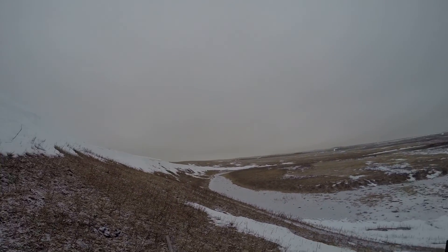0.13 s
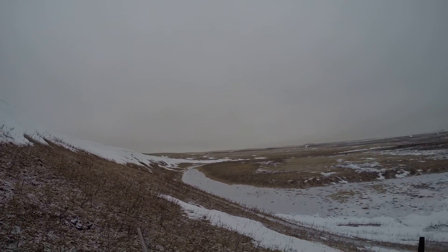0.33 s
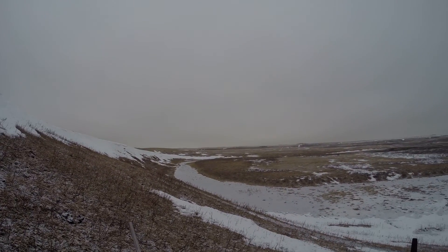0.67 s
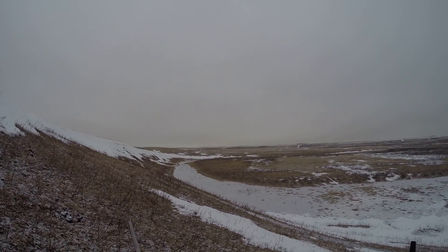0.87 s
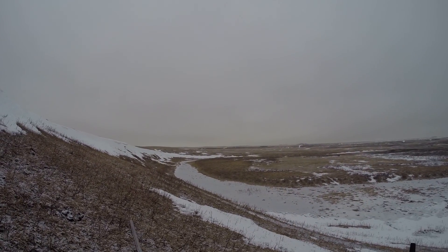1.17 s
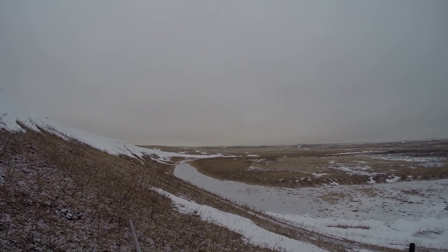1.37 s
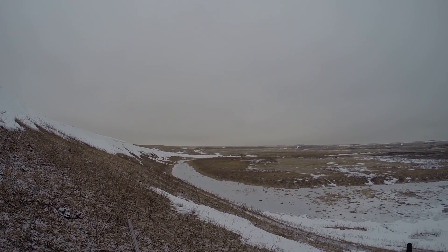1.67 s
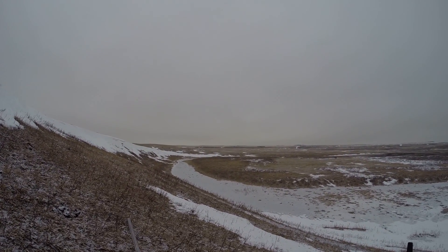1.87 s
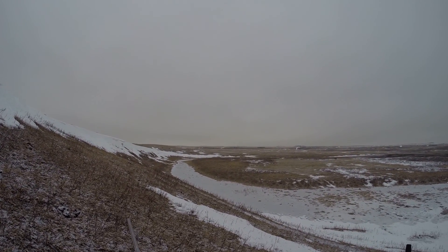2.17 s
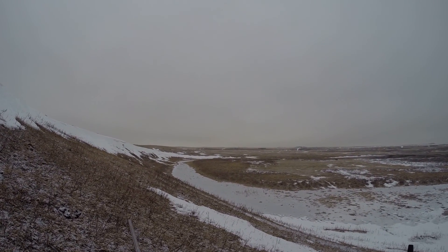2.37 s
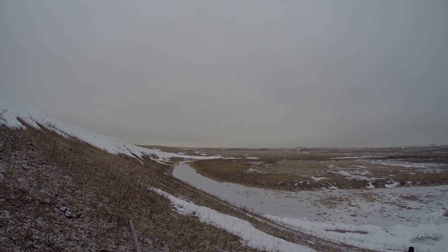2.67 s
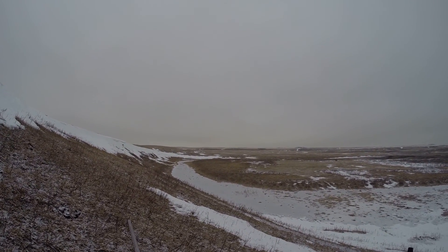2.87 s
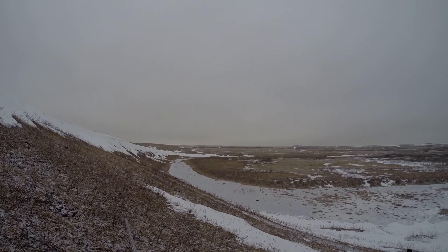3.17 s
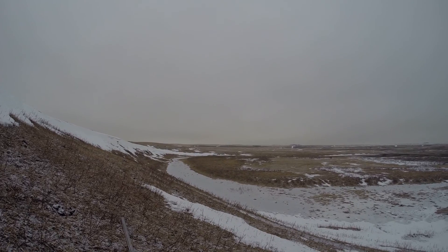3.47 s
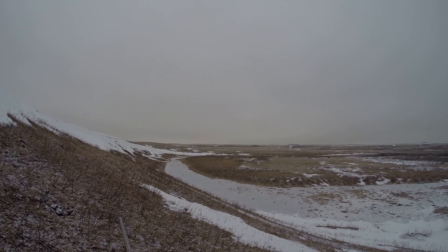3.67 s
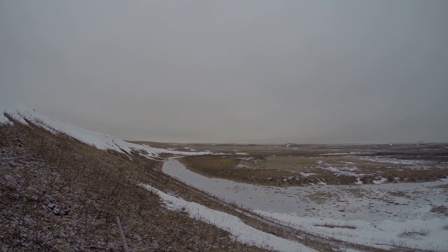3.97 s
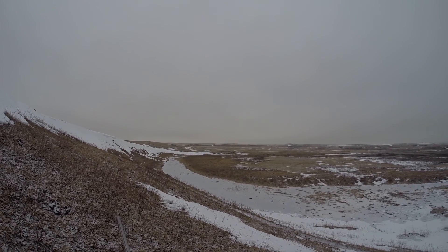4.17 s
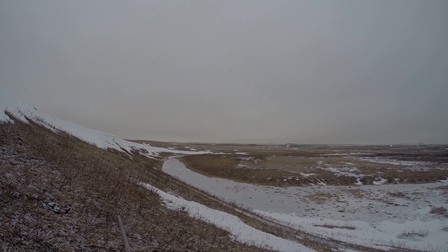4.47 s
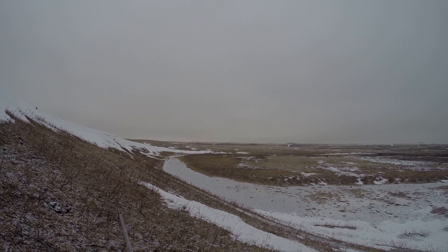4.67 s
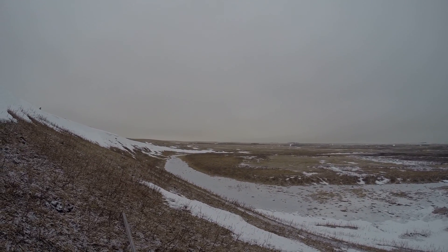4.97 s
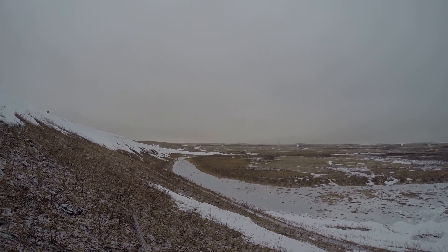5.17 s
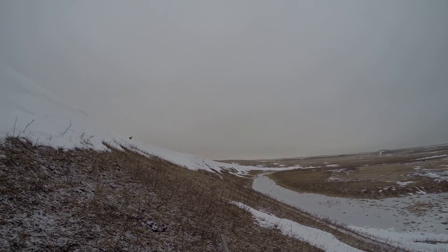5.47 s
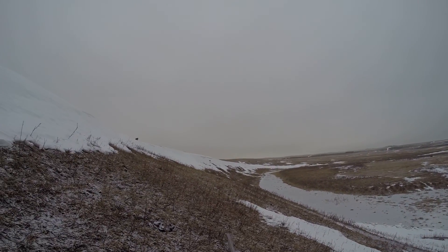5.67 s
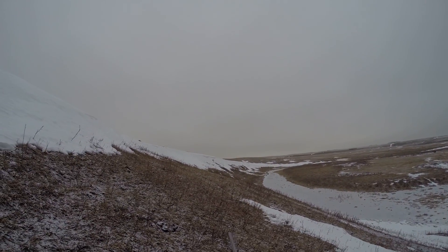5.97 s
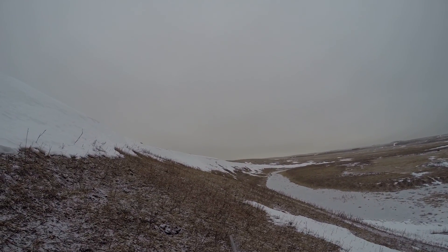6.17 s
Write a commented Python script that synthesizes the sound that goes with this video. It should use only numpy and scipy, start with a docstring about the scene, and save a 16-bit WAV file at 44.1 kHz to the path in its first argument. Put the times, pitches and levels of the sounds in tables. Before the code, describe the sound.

Coyotes call across an open, snowy valley. Two quick yips lead into a run of short, high howls that waver, jump in pitch and sometimes crack into roughness. Around four seconds in come four softer yips, then two more howls. Faint hoarse breath surrounds the calls and the slopes return a slight echo. A low breeze and soft hiss stay steady underneath.

```python
"""Coyotes yip and howl in a quick run across an open, snowy valley.
Their vocal folds oscillate in a nearly pure, gliding tone that drops an octave by period doubling
or turns rough in chaos. Throat and muzzle filter it by resonance, and turbulent breath adds hoarse air.
Reflection from the slopes returns a faint echo; behind it lie a low breeze and a soft hiss,
with faint high chirps and thin whistles."""
import sys
import numpy as np
from scipy import signal
from scipy.fft import rfft, irfft
from scipy.io import wavfile
from scipy.ndimage import uniform_filter1d

SR = 44100
rng = np.random.default_rng(int(sys.argv[2]) if len(sys.argv) > 2 else 0)


def to_wav(sig):
    """Store sig (one row per channel, or 1-D mono) as 16-bit WAV at the path in sys.argv[1].

    Samples outside -1..1 are clipped; the rate is SR.
    """
    pcm = np.clip(np.atleast_2d(sig), -1, 1) * 32767
    pcm = np.round(pcm).astype(np.int16)
    wavfile.write(sys.argv[1], SR, pcm.T)  # frames by channels


N = 278712
TIME = np.arange(N) / SR

# Fundamental of the short yips, one curve each: t/s, f/Hz, source level/dB
YIPS = [
    [(0.138, 874, -59), (0.146, 1010, -41.5), (0.158, 1239, -38), (0.176, 1233, -43.5), (0.2, 865, -48.5),
     (0.205, 882, -50)],
    [(0.29, 1175, -54), (0.298, 1200, -48), (0.318, 924, -45), (0.33, 1173, -39), (0.352, 1146, -35),
     (0.374, 970, -47), (0.385, 990, -73)],
    [(4.24, 992, -60), (4.26, 1002, -43.5), (4.286, 950, -45.5), (4.314, 963, -49.5), (4.33, 976, -61)],
    [(4.405, 1117, -49), (4.417, 1003, -51.5), (4.461, 1062, -38.5), (4.471, 1198, -40),
     (4.491, 1195, -42.5), (4.503, 1190, -66)],
    [(4.66, 896, -53), (4.684, 1005, -47), (4.698, 993, -42), (4.722, 906, -53), (4.73, 919, -55)],
    [(4.817, 1084, -59), (4.835, 956, -57.5), (4.855, 967, -52.5), (4.877, 1028, -49.5),
     (4.929, 1025, -54.5), (4.944, 980, -73)],
]
# Fundamental of the wavering howls, one curve each: t/s, f/Hz, source level/dB
HOWLS = [
    [(0.586, 964, -67), (0.592, 942, -53), (0.612, 941, -47), (0.64, 1031, -39), (0.674, 954, -41.5),
     (0.686, 1093, -38), (0.718, 1062, -40), (0.734, 992, -39), (0.778, 981, -46.5), (0.792, 1117, -43.5),
     (0.805, 1072, -55)],
    [(1.052, 927, -57), (1.068, 936, -42.5), (1.082, 1106, -35.5), (1.096, 1135, -36), (1.104, 1135, -41),
     (1.112, 1068, -41.5), (1.12, 962, -40), (1.146, 974, -47), (1.222, 954, -38.5), (1.276, 944, -43.5),
     (1.295, 876, -59)],
    [(1.475, 899, -52), (1.481, 912, -47.5), (1.495, 1131, -34), (1.511, 1316, -44), (1.545, 1025, -41.5),
     (1.577, 962, -40.5), (1.597, 1057, -36.5), (1.613, 1244, -30.5), (1.631, 1279, -38),
     (1.653, 1249, -32), (1.683, 1295, -35.5), (1.709, 1492, -38.5), (1.725, 1525, -37.5),
     (1.789, 1491, -35), (1.805, 1192, -36.5), (1.813, 1027, -49), (1.82, 1001, -52)],
    [(1.989, 956, -58), (2.007, 953, -41.5), (2.021, 958, -39.5), (2.037, 921, -48), (2.067, 899, -45),
     (2.101, 974, -39), (2.145, 973, -38.5), (2.163, 1120, -34), (2.171, 1119, -35), (2.181, 1056, -38.5),
     (2.191, 1110, -37), (2.201, 1099, -35.5), (2.215, 928, -42.5), (2.223, 915, -46), (2.309, 917, -43),
     (2.347, 957, -39), (2.371, 1020, -36), (2.475, 990, -34.5), (2.603, 975.5, -38.5), (2.612, 996, -52)],
    [(2.781, 933, -54.5), (2.795, 937, -41), (2.807, 1200, -35.5), (2.835, 1211, -34), (2.879, 1080, -36.5),
     (2.905, 1096, -37), (2.933, 1188, -37.5), (2.971, 1160, -38.5), (2.993, 1059, -38),
     (3.005, 934.5, -43), (3.101, 958, -40.5), (3.121, 1043, -38.5), (3.175, 943, -46), (3.203, 975, -38.5),
     (3.229, 1045, -38), (3.251, 1053, -44.5), (3.258, 1050, -54)],
    [(3.497, 977, -45), (3.503, 974, -47), (3.547, 980, -38.5), (3.597, 1122, -38), (3.641, 1143, -36),
     (3.723, 1151, -38), (3.775, 1306, -41), (3.863, 1370, -46), (3.869, 1424, -46.5), (3.897, 1267, -48),
     (3.911, 1485, -46), (3.957, 1634, -49), (3.999, 1608, -53), (4.025, 1478, -48), (4.033, 1430, -53)],
    [(5.122, 1004, -64), (5.136, 980, -57.5), (5.16, 1147, -57.5), (5.186, 1135, -59), (5.272, 1141, -41.5),
     (5.338, 1148, -35), (5.366, 1133, -36), (5.392, 1077, -38.5), (5.41, 1162, -35), (5.428, 1041, -37.5),
     (5.454, 980, -39), (5.552, 950.6, -45), (5.578, 985, -38), (5.587, 986, -49)],
    [(5.812, 1042, -53.5), (5.822, 1140, -35), (5.834, 1454, -34), (5.836, 1476, -34), (5.87, 1494, -33),
     (5.888, 1414, -35.5), (5.9, 1172, -35), (5.928, 1162, -38.5), (5.97, 1144, -32.5),
     (5.99, 986.5, -41.5), (5.998, 970, -39.5), (6.07, 916, -47), (6.136, 915.5, -52.5),
     (6.2, 907.0, -48.5), (6.296, 897.8, -68.5), (6.31, 924.6, -69)],
]
# Period doubling: start t/s, end t/s, subharmonic source level/dB
BREAKS = [(0.593, 0.79, -49), (1.088, 1.136, -50), (2.013, 2.083, -47), (2.093, 2.189, -43),
          (2.16, 2.237, -41), (2.385, 2.604, -40.5), (2.871, 3.009, -38.5), (2.973, 3.097, -45),
          (3.053, 3.223, -41), (3.66, 3.737, -39.5), (4.68, 4.726, -51), (5.353, 5.41, -48),
          (5.4, 5.515, -46.5), (5.95, 6.07, -40)]
# Cracks in the voice: start t/s, end t/s, beat rate as a share of the pitch, beat depth, chaos depth
CRACKS = [(0.314, 0.356, 0.2, 0.12, 0.46), (0.614, 0.77, .25, .03, .1), (0.771, .803, 0.25, 0.051, 0.6),
          (1.079, 1.115, 0.2, 0.036, 0.13), (1.471, 1.511, 0.28, .03, 0.13),
          (2.157, 2.199, 0.21, 0.14, 0.38), (2.783, 2.814, .25, 0.08, 0.31),
          (2.885, 2.918, 0.24, 0.35, 0.18), (2.908, 2.987, 0.23, 0.11, 0.56),
          (3.661, 3.744, .25, 0.28, 0.04), (3.807, 3.887, 0.32, 0.91, 0.22),
          (5.305, 5.357, 0.33, 0.053, .14), (5.345, 5.431, 0.25, 0.1, 0.2968), (5.879, 5.903, .25, .05, .2)]
# Pressed (brighter) or eased (duller) voice: start t/s, end t/s, overtone gain/dB
PRESSES = [(1.036, 1.141, 7), (1.56, 1.851, 1), (1.968, 2.08, 1), (2.205, 2.36, 2), (2.77, 3.018, 10.5),
           (3.475, 3.8, 10.5), (3.765, 4.06, 6.5), (4.645, 4.741, 8.5), (5.248, 5.5, 7), (5.76, 6.02, -13),
           (6.092, 6.4, -4)]
# Transfer function of the throat: f/Hz, gain/dB
THROAT = [(500, -21.5), (850, -2.5), (1550, 0), (1800, -27), (2300, 14), (3200, -2.5)]
# Resonances of the muzzle, which pick out single overtones: f/Hz, gain/dB
MUZZLE = [(2000, 0.5), (2130, -10), (2300, -1.5), (2520, -7), (2770, 7.5), (3100, -4), (3500, 2.5),
          (4000, -3.5)]
# Spectrum of the breath: f/Hz, relative level/dB
AIR_SPECTRUM = [(250, -14.5), (380, -4), (450, 5.5), (640, -9), (800, 4), (1100, 3.5), (1530, 4),
                (1720, -4), (1920, -4.5), (2100, -7.5), (2300, -4.5), (2480, -6), (2760, -7), (3500, -17),
                (6000, -23.5), (12000, -42)]
# Hoarse huffs around the calls: start t/s, end t/s, relative level/dB
HUFFS = [(0.247, 0.556, -67.5), (0.668, 0.91, -71), (1.145, 1.42, -66.5), (1.367, 1.568, -64),
         (1.575, 1.8, -68.5), (1.84, 1.956, -71), (3.1, 3.327, -66), (3.764, 4.15, -63),
         (4.196, 4.389, -63.5), (4.4, 4.619, -67), (4.703, 4.82, -66), (5.254, 5.5, -68),
         (6.108, 6.356, -66.5)]
# Reflections from the slopes: delay t/s, gain/dB ahead of ECHO_COLOUR
ECHOES = [(0.044, -40.5), (0.107, -30), (.155, -27.5), (0.202, -34.5)]
# Transfer function of the echo: f/Hz, gain/dB
ECHO_COLOUR = [(700, -15.5), (1000, -1.5), (1250, 1.5), (1500, 5), (2000, 19), (4000, 9)]
# Spectrum of the breeze and hiss: f/Hz, relative level/dB
BREEZE_SPECTRUM = [(15, -7), (33, 1), (60, -3.5), (100, -9.5), (230, -11), (350, -15.5), (470, -15.5),
                   (700, -18), (1400, -36.5), (2000, -25.5), (4000, -29), (8500, -36.5), (13800, -41),
                   (14500, -42.5)]
# Peaks of the high chirps: t/s
CHIRP_TIMES = [.67, .81, .94, 1.2, 1.31, 1.55, 1.791, 1.96, 2.199, 2.31, 3.141, 3.3, 3.67, 3.8, 4.039, 4.44,
               4.71, 4.84]
# Faint whines and whistles: start t/s, end t/s, start f/Hz, end f/Hz, level/dB
WHISTLES = [(0.098, 0.158, 1630, 1490, -60), (0.797, 0.902, 1550, 1640, -71),
            (1.028, 1.063, 1620, 1820, -64), (1.458, 1.481, 1620, 1800, -56),
            (2.767, 2.801, 1750, 1914, -51.5), (1.81, 1.963, 1520, 1510, -61.5),
            (2.94, 3.027, 13130, 13600, -82), (5.82, 5.895, 13220, 13400, -78)]

AIR_REST_DB, AIR_CALL_DB, AIR_CRACK_DB = -74, -75.5, -58.5  # relative flow: constant, calling, full chaos


def coyotes(jitter=0.0062, shimmer=0.06):
    """Source and filter: the vocal folds give a strong fundamental, and the muzzle's resonances shape it."""
    times, pitches, levels = np.vstack(sorted(YIPS + HOWLS, key=lambda call: call[0][0])).T
    hz, level_db = np.interp(TIME, times, pitches), np.interp(TIME, times, levels)
    waver = 1 + jitter * band_noise(0, 110)
    stumble = 0.0694 * chaos_depth(edge_s=0.0071) * band_noise(0, 95)  # chaos shakes the pitch too
    cycles = np.cumsum(uniform_filter1d(hz, size=120) * (waver + stumble)) / SR
    tone = np.exp(2j * np.pi * cycles)
    harmonics = gain_of(level_db) * tone + overtones(tone, hz, level_db)
    sounding = calling(YIPS, edge_s=0.014) + calling(HOWLS, edge_s=0.0027)
    envelope = np.sqrt(2) * sounding * (1 + shimmer * band_noise(0, 110))
    voice = envelope * harmonics
    halves = coloured(envelope * subharmonics(cycles, level_db), THROAT)
    return coloured(voice.real + halves, MUZZLE) + cracks(voice, cycles)


def overtones(tone, hz, level_db, ordinary_db=-39.5, pure_hz=961, buzzy_hz=947, fray=0.4):
    """Non-sinusoidal fold motion adds weak harmonics 2 to 4, stronger in loud, low or pressed notes."""
    buzz = np.clip((pure_hz - hz) / (pure_hz - buzzy_hz), 0, 1)
    overtone_db = -75.5 + 0.16 * (level_db - ordinary_db) + 10.5 * buzz + pressing_db()
    series = tone ** 2 + gain_of(-13) * tone ** 3 + gain_of(-28) * tone ** 4
    return gain_of(overtone_db) * series * (1 + fray * band_noise(0, 140))


def subharmonics(cycles, level_db, unbroken_db=-40, edge_share=0.26):
    """Period doubling puts lines at odd multiples of half the pitch; a trace remains between breaks."""
    breaks = sum(gain_of(db) * gate(start, end, edge_share * (end - start)) for start, end, db in BREAKS)
    lines = sum(gain_of(db) * np.cos(2 * np.pi * ratio * cycles)
                for ratio, db in [(0.5, -22), (1.5, 0), (2.5, -38), (3.5, -32)])
    return (gain_of(level_db + unbroken_db) + breaks) * lines


def cracks(voice, cycles):
    """Modulation: the folds beat or tumble into chaos, making sidebands that the throat filters."""
    chaos = (band_noise(140, 210) + 1j * band_noise(90, 190)) / np.sqrt(2)
    modulation = np.zeros(N, complex)
    for start, end, share, beat_depth, rough in CRACKS:
        beat = beat_depth * np.cos(2 * np.pi * share * cycles)
        modulation += gate(start, end, edge_s=0.01) * (beat + rough * chaos)
    return coloured((voice * modulation).real, THROAT)


def calling(calls, edge_s):
    """Phonation envelope: 1 during the given calls, 0 in the pauses."""
    return sum(gate(call[0][0] - edge_s / 2, call[-1][0] + edge_s / 2, edge_s) for call in calls)


def chaos_depth(edge_s):
    """Depth of aperiodic fold motion at each moment."""
    return sum(rough * gate(start, end, edge_s) for start, end, _, _, rough in CRACKS)


def pressing_db():
    """Pressed phonation strengthens the overtones; eased phonation weakens them."""
    return sum(db * gate(start, end, edge_s=0.046) for start, end, db in PRESSES)


def hoarse_air(gain_db=9, flutter_db=0.8, patchy_db=3.5):
    """Turbulence in the throat gives broadband noise, in which narrow bands swell briefly."""
    frames = dict(nperseg=2048, noverlap=1536)
    spectra = signal.stft(coloured(rng.standard_normal(N), AIR_SPECTRUM), **frames)[2]
    patches = uniform_filter1d(rng.standard_normal(spectra.shape), size=4, axis=0)  # across frequency
    patches = unit_rms(uniform_filter1d(patches, size=9, axis=1))  # across time
    rush = unit_rms(signal.istft(spectra * gain_of(patchy_db * patches), **frames)[1][:N])
    return rush * air_flow() * gain_of(gain_db + flutter_db * band_noise(0, 27))


def air_flow(blur_s=0.13, press_share=0.27):
    """Incoherent noises add in power: resting breath, leakage in calls and cracks, and huffs."""
    call_leak = gain_of(AIR_CALL_DB + press_share * pressing_db()) * calling(YIPS + HOWLS, edge_s=0.014)
    crack_leak = gain_of(AIR_CRACK_DB) * chaos_depth(edge_s=0.029)
    leak_power = uniform_filter1d(call_leak ** 2 + crack_leak ** 2, int(blur_s * SR))
    return np.sqrt(gain_of(AIR_REST_DB) ** 2 + leak_power + huffing() ** 2)


def huffing():
    """Amplitude envelope of the huffs of breath."""
    return sum(gain_of(db) * gate(start, end, edge_s=0.067) for start, end, db in HUFFS)


def rasps():
    """Narrow-band breath noise: one band on the pressed voice, a higher one on the huffs."""
    strain = np.maximum(gain_of(pressing_db()) - 1, 0)
    rasp = gain_of(AIR_CALL_DB - 13) * strain * band_noise(2100, 160)
    return rasp + gain_of(-9) * huffing() * band_noise(2680, 200)


def valley_echo(x, scatter_db=-26, t60_s=1.0, spread_s=0.009):
    """Reflection from the slopes gives smeared echoes; scattering by rough ground adds a thin tail."""
    t = TIME[:SR]
    scatter = rng.standard_normal(SR) * np.minimum(t / 0.02, 1) * gain_of(-60 * t / t60_s)
    response = gain_of(scatter_db) * scatter / np.linalg.norm(scatter)
    for delay, db in ECHOES:
        smear = rng.standard_normal(SR) * np.exp(-abs(t - delay) / spread_s)
        response += gain_of(db) * smear / np.linalg.norm(smear)
    return coloured(signal.fftconvolve(x, response)[:N], ECHO_COLOUR)


def breeze(level_db=-58.5, swell_db=0.02):
    """Almost stationary broadband noise: a low breeze and an even hiss."""
    noise = unit_rms(coloured(rng.standard_normal(N), BREEZE_SPECTRUM))
    return noise * gain_of(level_db - swell_db * band_noise(0, 7.6))


def chirps(level_db=-78.5, half_width_s=0.048):
    """Gaussian pulses of narrow-band noise make soft, hissy chirps far above the calls."""
    swells = sum(np.exp(-((TIME - peak) / half_width_s) ** 2) for peak in CHIRP_TIMES)
    return gain_of(level_db) * swells * band_noise(7600, 420)


def whistles(waver=0.005, shimmer=0.43):
    """Faint gliding sinusoids waver by random frequency and amplitude modulation."""
    tones = np.zeros(N)
    drift = 1 + waver * band_noise(0, 200)
    for start, end, start_hz, end_hz, db in WHISTLES:
        hz = np.interp(TIME, [start, end], [start_hz, end_hz]) * drift
        tone = np.sqrt(2) * np.sin(2 * np.pi * np.cumsum(hz) / SR)
        tones += gain_of(db) * gate(start, end, edge_s=0.011) * tone
    return tones * (1 + shimmer * band_noise(0, 40))


def gain_of(db):
    """Amplitude ratio of a level in decibels."""
    return 10 ** (np.asarray(db) / 20)


def unit_rms(x):
    """Normalisation to an rms of 1."""
    return x / np.sqrt(np.mean(x ** 2) + 1e-20)


def coloured(x, points):
    """Zero-phase filtering by a curve through points of f/Hz, gain/dB."""
    hz, db = np.transpose(points)
    f = np.fft.rfftfreq(len(x), 1 / SR)
    return irfft(rfft(x) * gain_of(np.interp(np.log(f + 1), np.log(hz), db)), len(x))


def band_noise(centre_hz, width_hz):
    """Noise of rms 1 in a Gaussian band; centred on zero it is a random waver."""
    f = np.fft.rfftfreq(N, 1 / SR)
    band = np.exp(-((f - centre_hz) / width_hz) ** 2)
    return unit_rms(irfft(rfft(rng.standard_normal(N)) * band, N))


def gate(start, end, edge_s):
    """A window with raised-cosine edges."""
    return np.sin(np.pi / 2 * np.clip(np.minimum(TIME - start, end - TIME) / edge_s, 0, 1)) ** 2


def scene():
    """Superposition of the pack, its echo and the background, in one channel."""
    pack = coyotes() + hoarse_air() + rasps()
    return (pack + valley_echo(pack) + breeze() + chirps() + whistles())[None]


def record(dry):
    """Band limiting: a steep low-pass filter removes the highest treble."""
    lowpass = signal.firwin(511, cutoff=15100, window=("kaiser", 9), fs=SR)
    return signal.oaconvolve(dry, lowpass[None], "same")


dry = scene()
out = record(dry)
to_wav(out)
```